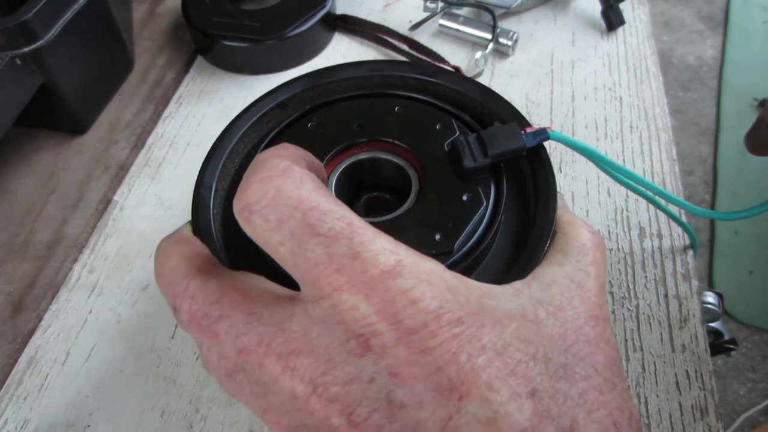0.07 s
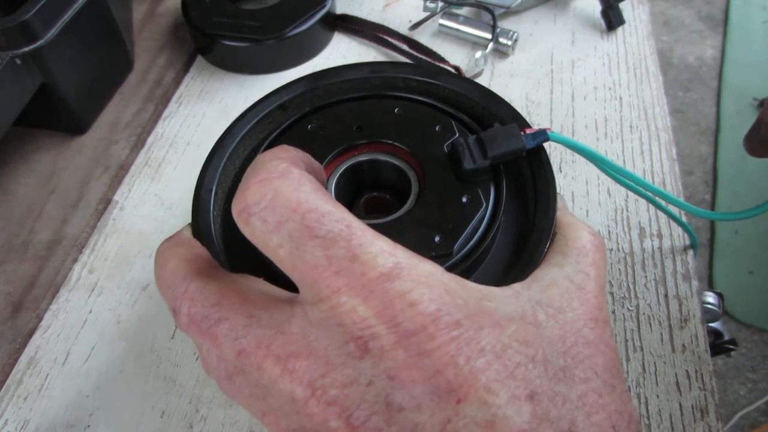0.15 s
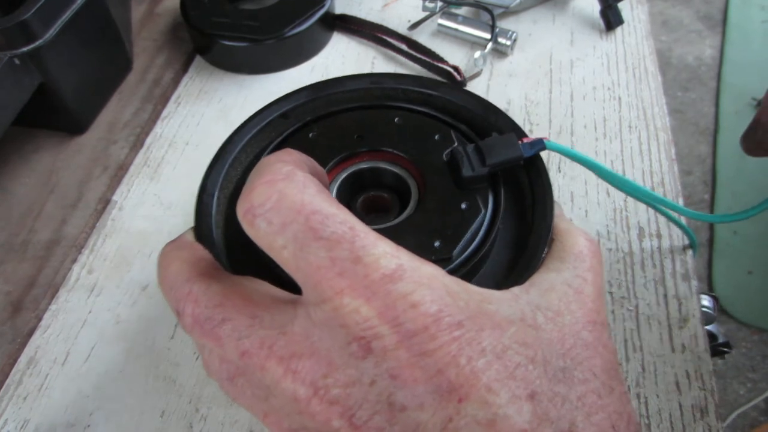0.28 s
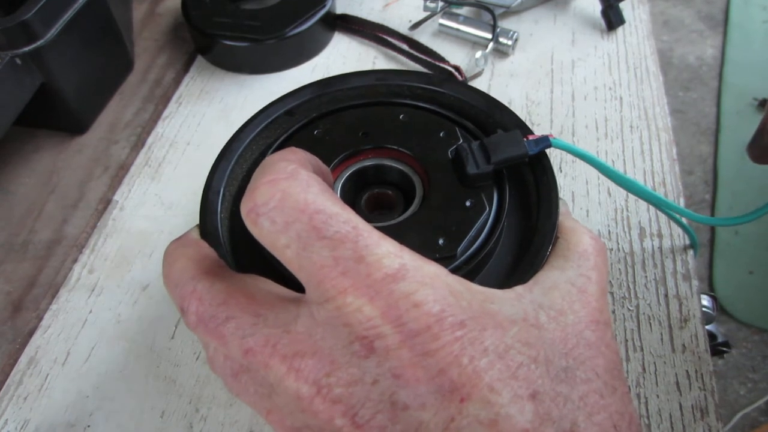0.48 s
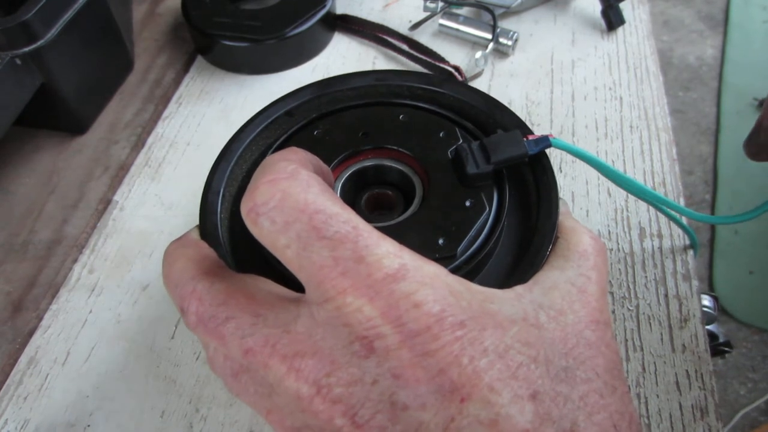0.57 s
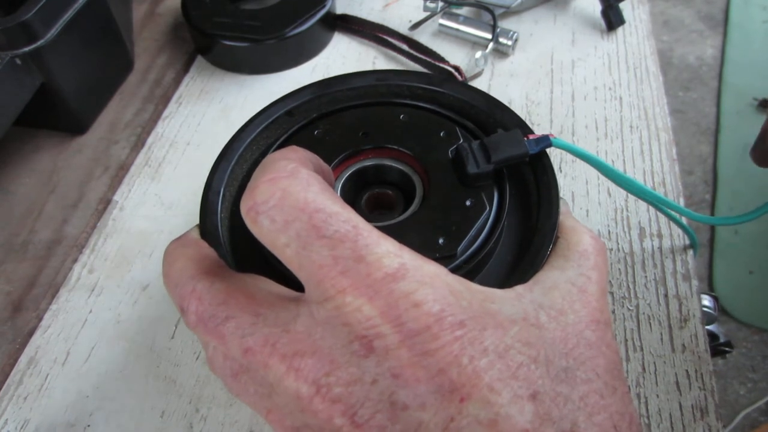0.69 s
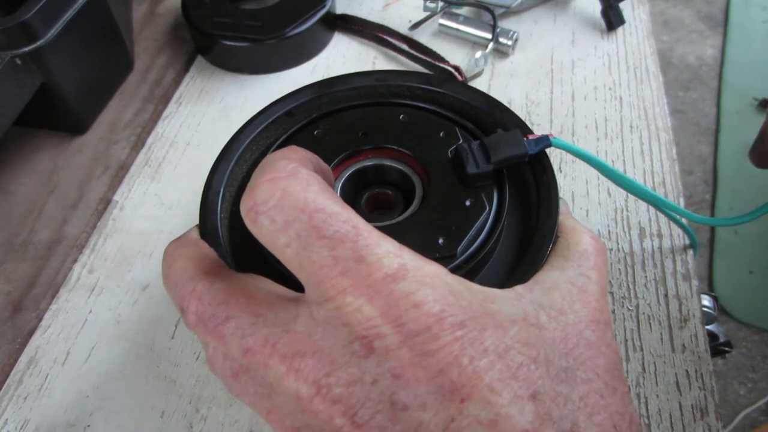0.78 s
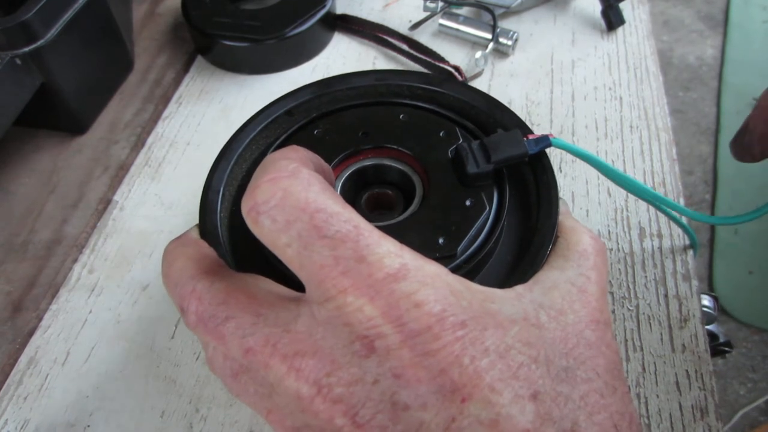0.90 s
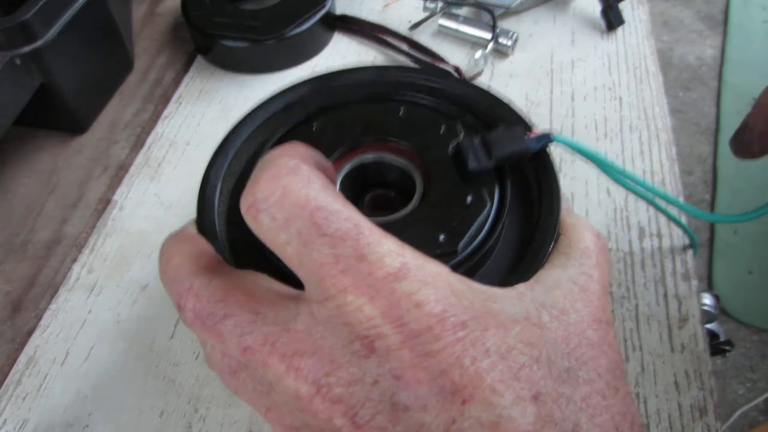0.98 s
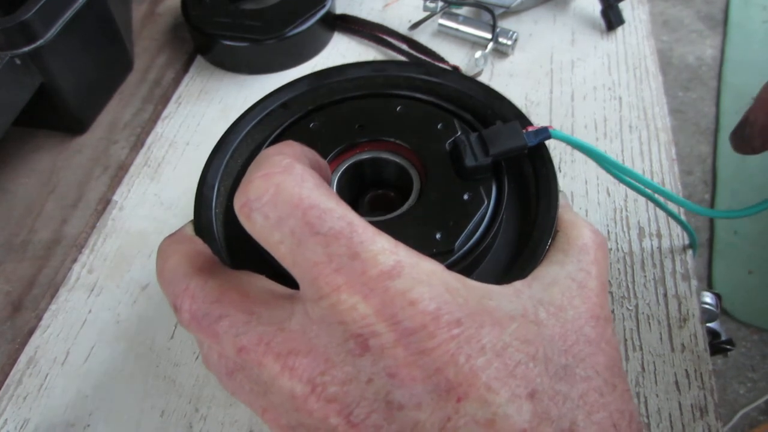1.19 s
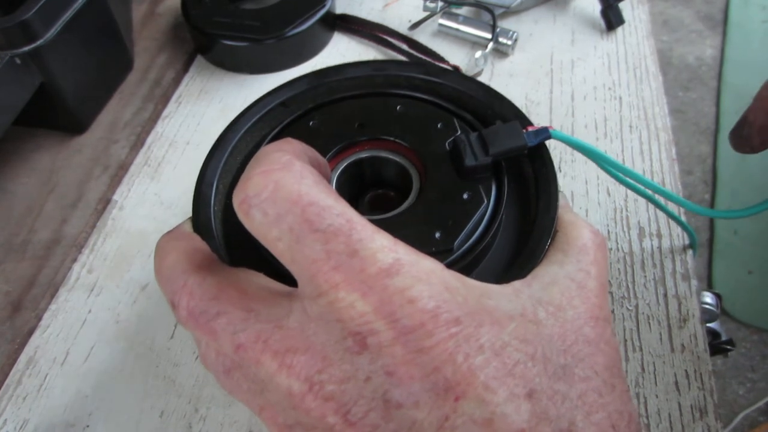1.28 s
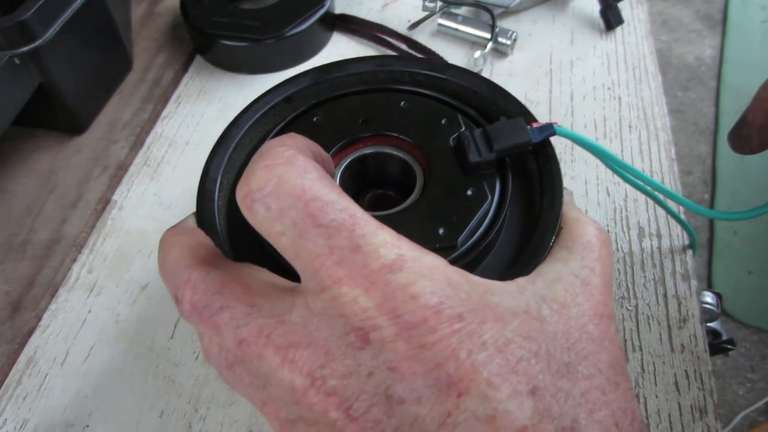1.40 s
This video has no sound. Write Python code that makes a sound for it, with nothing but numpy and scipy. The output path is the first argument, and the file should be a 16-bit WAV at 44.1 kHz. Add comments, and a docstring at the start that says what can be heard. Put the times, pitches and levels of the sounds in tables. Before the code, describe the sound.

A steel plate snaps loudly onto a hand-held electromagnetic clutch and chatters briefly; after a pause, a wire spark ticks and the clutch knocks on a wooden bench with gritty rattle, close-miked outdoors over faint hum.

```python
"""A steel plate snaps onto the coil of a hand-held electromagnetic clutch and chatters; a jumper lead sparks,
then the clutch rocks and thuds on a wooden bench with a gritty rattle, over outdoor hum and faint chirps.
Plate and boards are dying modes, thuds are damped swings, grit and sparks are bursts of coloured noise.
Each near source has its own echo; the camera's gain control ducks after bright peaks, then loud peaks clip."""
import sys
import numpy as np
from scipy import signal
from scipy.fft import rfft, irfft, next_fast_len
from scipy.io import wavfile
from scipy.ndimage import map_coordinates

SR = 44100
rng = np.random.default_rng(int(sys.argv[2]) if len(sys.argv) > 2 else 0)


def bounce(signal):
    """Save signal as a 16-bit WAV file at the path given by the first command-line argument."""
    frames = np.transpose(np.atleast_2d(signal))
    limited = np.clip(frames, -1, 1)
    pcm = np.round(limited * 32767).astype(np.int16)
    wavfile.write(sys.argv[1], SR, pcm)


def volts_from_db(level):
    """Convert decibel levels to linear amplitude ratios."""
    exponent = np.asarray(level, float) / 20
    return 10 ** exponent


N = 63945  # length of the scene in samples
T = np.arange(SR // 4) / SR  # time within one event, seconds


def unit(x):
    """Scale a sound to rms 1."""
    return x / np.sqrt(np.mean(x ** 2) + 1e-20)


def filtered(x, response):
    """Shape the spectrum of x by a response, a function of frequency in Hz."""
    m = next_fast_len(len(x) + 8192)
    spectrum = rfft(x, m) * response(np.fft.rfftfreq(m, 1 / SR))
    return irfft(spectrum, m)[:len(x)]


def along(points, hz):
    """Read a curve of (Hz, value) points on a logarithmic frequency axis."""
    point_hz, value = np.transpose(points)
    return np.interp(np.log(hz + 1), np.log(point_hz + 1), value)


def noise(spectrum, size):
    """Coloured noise of rms 1: white noise shaped by (Hz, dB) points."""
    white = rng.standard_normal(size)
    return unit(filtered(white, lambda hz: volts_from_db(along(spectrum, hz))))


def wobble(rate, size):
    """A smooth random curve with rate knots a second."""
    knots = rng.standard_normal(int(size * rate / SR) + 4)
    return map_coordinates(knots, [np.arange(size) * rate / SR])


def ring(hz, db, t60):
    """A sum of sine modes, each dying by 60 dB in its t60 seconds."""
    hz, db, t60 = (np.asarray(v)[:, None] for v in (hz, db, t60))
    modes = volts_from_db(db - 60 * T / t60) * np.sin(2 * np.pi * hz * T)
    return np.sum(modes, axis=0)


def add(track, s, sound):
    """Mix a sound into the track at s seconds."""
    part = track[round(s * SR):][:len(sound)]
    part += sound[:len(part)]


def outdoor_hum():
    """Broad noise with a slowly drifting level, over a low rumble that swells and sinks."""
    # Spectrum of the hum. Each row: frequency in Hz, relative density in dB per Hz.
    hum_spectrum = [(12, -37), (20, -5), (47, -4.5), (171, -8), (299, -17), (454, -16.5), (600, -18),
                    (862, -12), (1830, -21.5), (2630, -31), (3020, -30), (4110, -42.5), (6980, -41),
                    (11500, -61), (15700, -57)]
    rumble_top_hz, rumble_db, rumble_swing_db = 89, -58.5, 4.5
    hum = volts_from_db(-54.5 + 1.1 * wobble(6, N)) * noise(hum_spectrum, N)
    white = rng.standard_normal(N)
    low = unit(filtered(white, lambda hz: hz / (hz + 30) / (1 + (hz / rumble_top_hz) ** 4)))
    return hum + volts_from_db(rumble_db + rumble_swing_db * wobble(14, N)) * low


def chirps():
    """Distant gliding tones whose pitch and level waver at random."""
    # Faint calls. Each row: start in seconds, length in seconds, start pitch in Hz, end pitch in Hz,
    # level in dB.
    chirp_calls = [(.088, .05, 4700, 4500, -79), (.105, .07, 3900, 3880, -78), (.67, .2, 5700, 5680, -82),
                   (1.07, .04, 3900, 3800, -74), (1.16, .2, 3300, 3000, -71)]
    waver_hz, breaks_db = 130, 3
    out = np.zeros(N)
    for s, length, from_hz, to_hz, db in chirp_calls:
        n = round(length * SR)
        hz = np.linspace(from_hz, to_hz, n) + waver_hz * wobble(300, n)
        level = volts_from_db(db + breaks_db * wobble(60, n)) * np.hanning(n) ** 0.3
        add(out, s, level * np.sin(2 * np.pi * np.cumsum(hz) / SR))
    return out


def room(x):
    """Echo of x: a noise tail in which each frequency dies at its own speed."""
    # Decay of the echo. Each row: frequency in Hz, t60 in seconds.
    echo_decay = [(150, 0.33), (500, 0.21), (1500, 0.27), (4000, 0.32), (8000, 0.32), (14000, .16)]
    hz, t, z = signal.stft(rng.standard_normal(SR // 2), SR, nperseg=256)
    fading = z * volts_from_db(-60 * t / along(echo_decay, hz)[:, None])
    tail = signal.istft(fading, SR, nperseg=256)[1]
    late = np.pad(x, (200, 0))  # the echo waits 200 samples
    return signal.fftconvolve(late, tail / np.linalg.norm(tail))[:N]


def grit():
    """Grit rattling under the clutch: lumpy noise bursts of fine contacts, quick to rise and to die."""
    # Bursts. Each row: time of the peak in seconds, rise in seconds, t60 in seconds, level in dB.
    rattle_bursts = [(0.9486, .002, 0.052, -41), (0.9541, .003, 0.055, -32.5), (0.9765, .003, 0.034, -33),
                     (0.9809, .002, 0.048, -24.5), (1.0025, 0.0026, 0.0266, -30),
                     (1.0069, .001, 0.037, -25), (1.0118, .002, 0.013, -24.5), (1.017, .002, 0.024, -33)]
    # Colour of the grit. Each row: frequency in Hz, relative density in dB per Hz.
    grit_spectrum = [(820, -30), (1400, -6.5), (1760, -6), (2160, -0.5), (2530, -2.5), (2980, -15.5),
                     (3260, -10.5), (4410, -15.5), (4830, -26), (5280, -16), (6210, -22.5), (6930, -17),
                     (7660, -29), (9090, -22.5), (11600, -51.5), (13600, -42), (15500, -63)]
    lumps_db = 2.2
    out = np.zeros(N)
    for s, rise, t60, db in rattle_bursts:
        shape = np.where(T < rise, (T / rise) ** 2, volts_from_db(-60 * (T - rise) / t60))
        lumps = volts_from_db(lumps_db * wobble(700, len(T)))
        add(out, s - rise, volts_from_db(db) * shape * unit(lumps * noise(grit_spectrum, len(T))))
    return out


def lead():
    # Sparks. Each row: start in seconds, level in dB, t60 of the fizz in seconds.
    spark_times = [(.8577, -50, .012), (.8584, -48, .006), (.8592, -46, .004), (.8613, -15, .003),
                   (.8622, -30, .005), (.8633, -26, .003), (.8639, -25, .003)]
    # Colour of the fizz. Each row: frequency in Hz, relative density in dB per Hz.
    fizz_spectrum = [(290, -27), (500, -30.5), (2510, -8), (4100, -18.5), (6500, -14), (10000, -3.5),
                     (13200, -23.5), (15700, -29.5)]
    # Modes of the lead's clip. Each row: frequency in Hz, level in dB, t60 in seconds.
    clip_modes = [(950, -41, 0.061), (1300, -35.5, 0.022), (1520, -42, 0.019)]
    fizz_db = -8.5  # against the spit
    out = np.zeros(N)
    spit = -ring([6840], [0], [.0009])
    for s, db, t60 in spark_times:
        fizz = volts_from_db(fizz_db - 60 * T / t60) * noise(fizz_spectrum, len(T))
        add(out, s, volts_from_db(db) * (spit + fizz))
    add(out, spark_times[-1][0], ring(*np.transpose(clip_modes)))
    return out


def bench():
    """Clutch on the bench: a short push, a damped swing back, and the boards ringing on."""
    # Thuds. Each row: centre of the push in seconds, peak level of the swing in dB, contact width in ms
    # (standard deviation of the push), swing pitch in Hz, direction (+1 push, -1 lift).
    thud_blows = [(0.2443, -23, 0.53, 150.7, 1), (0.748, -39, 0.94, 79, -1), (.9465, -9.5, 0.28, 400, 1),
                  (0.9501, -7.5, 0.21, 246, 1), (0.955, -22, 0.29, 410, -1), (0.9714, -1.5, 0.25, 185, 1),
                  (0.9772, -15.5, .3, 278, -1), (.9795, -14, .2, 388, -1), (.9839, -17, .15, 362, 1),
                  (0.9982, -4.5, 0.178, 193, 1), (1.0032, -14.5, 0.18, 250, 1),
                  (1.0070, -11, 0.16, 278, -1), (1.0106, -16.5, 0.56, 265, 1)]
    # Modes of the boards. Each row: frequency in Hz, relative level in dB, t60 in seconds.
    board_modes = [(124, -12.5, 0.04), (152, -3.5, 0.29), (172, -7, .12), (232, -7, 0.11), (256, 2, .14),
                   (306, -6, .14), (438, 5.5, 0.1), (480, -6.5, .05), (600, -10.5, 0.069),
                   (720, -4.5, 0.065), (1120, -1.5, 0.028), (1350, -3, 0.02)]
    damping, boards_db = .36, -27.5  # damping ratio of the swing; boards against the swing
    early = .005  # seconds by which a thud is laid in ahead of its push
    out = np.zeros(N)
    hz, level_db, t60 = np.transpose(board_modes)
    for s, db, contact_ms, pitch_hz, sign in thud_blows:
        push = np.exp(-.5 * ((T - early) * 1000 / contact_ms) ** 2)
        # a damped resonance that lets through only what lies around and above its pitch
        swing = filtered(push, lambda f: f * f / (f * f - pitch_hz ** 2 - 2j * damping * f * pitch_hz))
        modes = ring(hz, level_db + rng.normal(0, 2, len(hz)), t60)
        boards = signal.fftconvolve(push / push.sum(), modes)[:len(T)]
        add(out, s - early, sign * volts_from_db(db) * (swing / swing.max() - volts_from_db(boards_db) * boards))
    return out


def plate():
    """Plate on coil: every blow rings the same modes; edge and flat landings favour different ones."""
    # Blows. Each row: start in seconds, level in dB, landing from 0 (edge) to 1 (flat).
    snap_blows = [(.2004, -3.5, 0), (.20118, -2, 0), (.2168, 3, 1), (.2222, -20, .6), (.2256, -17, .7),
                  (.2285, -14, .6), (.2385, -25, .8), (.2475, -26, .7), (.2515, -25, .3)]
    # Pitches of the plate modes, one per mode, in Hz.
    plate_hz = [440, 770, 1060, 1175, 1350, 1700, 1940, 2830, 3500, 4250, 4680, 5570, 6230, 6640, 7700,
                8550, 9500, 10600, 12300, 13950, 15520]
    # The same modes in order. Each row: t60 in seconds, level on edge in dB, level flat in dB.
    plate_modes = [(.025, -38.5, -25), (.012, -17.5, -11), (0.016, -8.5, -14.5), (.06, -16, -13.5),
                   (0.013, -1.5, -11), (0.0064, -22, 2), (.016, -21, -14), (0.014, -14, -11.5),
                   (0.013, -28.5, -15), (0.025, -19.5, -19.5), (0.013, -22.5, -10), (0.014, -13, -18),
                   (0.017, -19, -22.5), (0.013, -28, -16), (0.0087, -18, -18), (0.0091, -23.5, -13.5),
                   (.008, -13, -18), (0.011, -22.5, -22.5), (.008, -32.5, -38), (.02, -37.5, -32.5),
                   (.025, -45, -43.5)]
    # Loose parts buzzing after a blow. Each row: frequency in Hz, relative density in dB per Hz.
    buzz_spectrum = [(290, -41), (500, -12.5), (687, -18.5), (1170, -1.5), (1500, -16.5), (1910, -4),
                     (2510, -23), (6500, -22.5), (10000, -28.5), (11600, -41), (15700, -36.5)]
    rise_s = .0002
    crack_db, crack_t60 = -22, .004
    buzz_db, buzz_t60 = -26.5, .07
    out = np.zeros(N)
    t60, edge_db, flat_db = np.transpose(plate_modes)
    for s, db, flat in snap_blows:
        mode_db = (1 - flat) * edge_db + flat * flat_db + rng.normal(0, 1, len(t60))
        modes = ring(plate_hz, mode_db, t60)
        crack = volts_from_db(crack_db - 60 * T / crack_t60) * rng.standard_normal(len(T))
        buzz = volts_from_db(buzz_db - 60 * T / buzz_t60) * noise(buzz_spectrum, len(T))
        onset = 1 - np.exp(-T / rise_s)
        add(out, s, volts_from_db(db) * (crack + buzz - modes) * onset)
    return out


def scene():
    """Near sources, each with its own echo, over the outdoor background."""
    out = outdoor_hum() + chirps()
    # echo levels in dB
    for near, echo_db in ((grit(), -24), (lead(), -22), (bench(), -14.5), (plate(), -19.5)):
        out += near + volts_from_db(echo_db) * room(near)
    return out[None]


def roll_off(x):
    """The treble ends steeply here."""
    return signal.sosfilt(signal.butter(12, 15820, fs=SR, output="sos"), x)


def record(dry):
    """The camera: band limits, a gain that ducks soon after bright peaks and creeps back, then clipping."""
    mic_low_hz, top_hz = 37.8, 15800
    duck_above_hz, duck_from_db = 800, -11  # only the sound above this pitch and peak level ducks the gain
    duck_ratio, duck_in_s, duck_out_s = 1.2, .13, 0.39  # dB of cut per dB over; time constants
    clip_hardness = 8
    heard = filtered(dry[0], lambda hz: (hz < top_hz) * (1j * hz / (mic_low_hz + 1j * hz)) ** 2)

    bright = np.abs(filtered(heard, lambda hz: hz > duck_above_hz))
    bright_db = 20 * np.log10(np.minimum(bright, 1) + 1e-9)
    over_db = np.maximum(bright_db - duck_from_db, 0)
    # hold each peak and let it fade exponentially
    fade = np.arange(N) / (duck_out_s * SR)
    held_db = np.exp(np.maximum.accumulate(np.log(over_db + 1e-9) + fade) - fade)
    # a one-pole smoother makes the duck set in gradually
    k = 1 / (duck_in_s * SR)
    cut_db = duck_ratio * signal.lfilter([k], [1, k - 1], held_db)

    x = heard[None] * volts_from_db(-cut_db)
    clipped = x / (1 + np.abs(x) ** clip_hardness) ** (1 / clip_hardness)
    return roll_off(clipped)


dry = scene()
out = record(dry)
bounce(out)
```